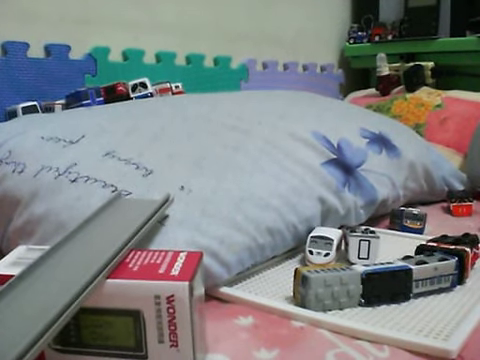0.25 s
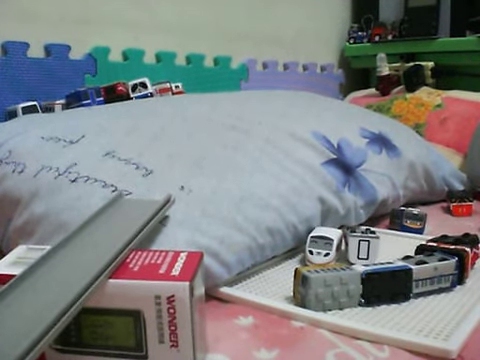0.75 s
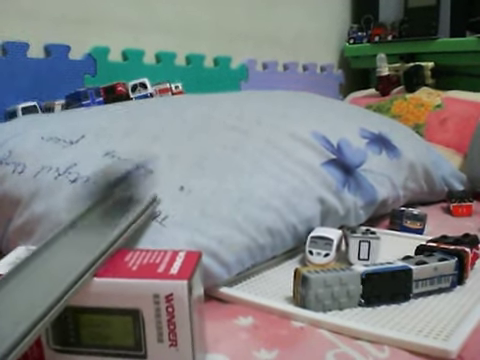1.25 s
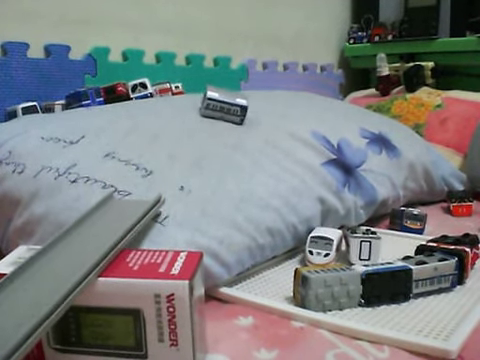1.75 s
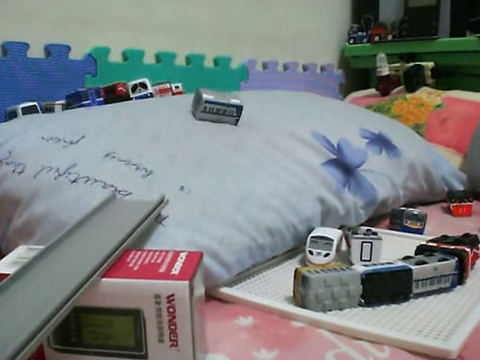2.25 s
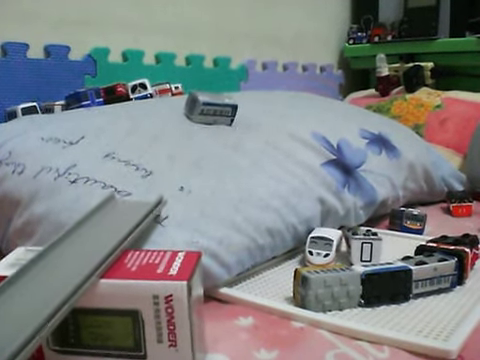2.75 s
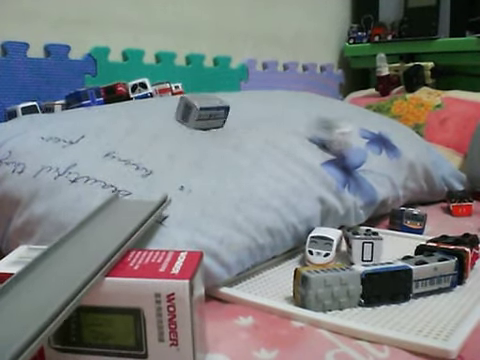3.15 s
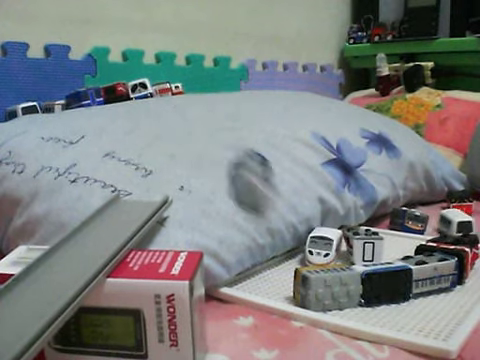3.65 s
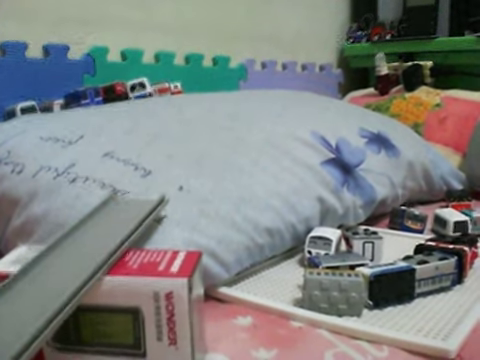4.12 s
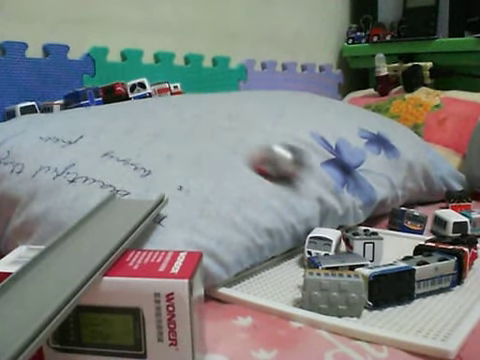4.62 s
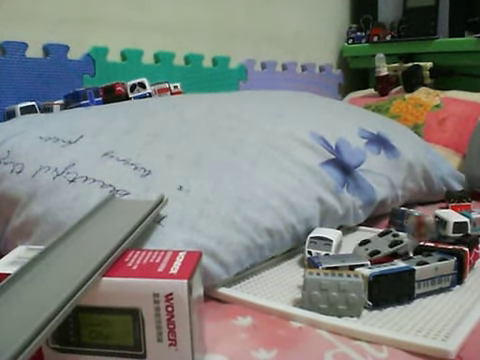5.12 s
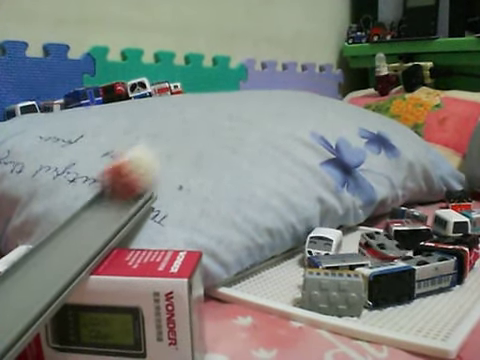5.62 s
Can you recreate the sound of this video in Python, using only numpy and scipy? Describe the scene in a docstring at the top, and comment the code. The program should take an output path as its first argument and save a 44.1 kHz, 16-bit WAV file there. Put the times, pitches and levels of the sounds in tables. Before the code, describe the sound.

Close up in a small, quiet room, a flywheel toy train is wound with three quick whirring strokes. Toy trains then go over a plastic ramp one after another: a brief clatter of hard wheels, then a buzzing gear rattle that slowly softens. Sharp plastic clicks and hollow knocks mark their collisions, while another toy whirs faintly further off. The last two pushes whine upward, the final one with a quick ratcheting skip.

```python
"""Flywheel toy trains on a ramp.

A small room, microphone close. Toy trains are wound by hand and pushed over a plastic ramp onto a
pillow, with faint whirring further off. Gear teeth whine upward under a push and hard wheels rumble
on the ramp; then loose gears rattle in the shell, ever softer as the flywheel runs down.
The toys click against each other and knock on the ramp and the floor."""
import sys
import numpy as np
from scipy import signal
from scipy.fft import rfft, irfft
from scipy.io import wavfile
from scipy.ndimage import uniform_filter1d

SR = 44100
rng = np.random.default_rng(int(sys.argv[2]) if len(sys.argv) > 2 else 0)


def transcribe(u):
    """Save the signal u as a 16-bit wav file named by the first command-line argument.

    u: samples, shape (n,) or (channels, n), limited to [-1, 1]; the rate is SR.
    q: integer samples, one column per channel.
    """
    v = np.clip(np.atleast_2d(u).T, -1, 1)
    q = np.round(v * 32767).astype(np.int16)
    wavfile.write(sys.argv[1], SR, q)


N = 259308
TIME = np.arange(N) / SR


def amp(db):
    """Decibels to gain."""
    return 10 ** (np.asarray(db) / 20)


def unit(x):
    """Scale to rms 1."""
    return x / np.sqrt(np.mean(x ** 2) + 1e-18)


def steady(x):
    """Hold the running rms near 1."""
    return x / np.sqrt(np.abs(uniform_filter1d(x ** 2, size=6000)) + 1e-12)


def progress(start, end):
    """Rises from 0 to 1 between two times."""
    return np.clip((TIME - start) / (end - start), 0, 1)


def gate(start, end):
    """1 between two times, with soft edges."""
    return uniform_filter1d(1. * ((TIME >= start) & (TIME <= end)), size=200)


def band(x, hz, kind, order=2):
    """Butterworth filter."""
    return signal.sosfilt(signal.butter(order, hz, kind, fs=SR, output="sos"), x)


def through(x, response):
    """Pass a sound through an impulse response."""
    return signal.fftconvolve(x, response)[:len(x)]


def fading(t60, seconds):
    """Noise that dies away, energy 1: a crowd of close modes."""
    t = TIME[:int(seconds * SR)]
    tail = rng.standard_normal(len(t)) * amp(-60 * t / t60)
    return tail / np.linalg.norm(tail)


def body(colour, rings=(), broad_db=0, size=4096):
    """Impulse response of a broad colour with resonances standing out of it."""
    f = np.arange(size // 2 + 1) * SR / size + 1
    hz, db = np.transpose(colour)
    power = amp(np.interp(np.log(f), np.log(hz), db) + broad_db) ** 2
    for centre, width, ring_db in rings:
        power += amp(ring_db) ** 2 / (1 + ((f - centre) / width) ** 2) ** 2
    cepstrum = irfft(np.log(power) / 2)
    cepstrum[1:size // 2] *= 2  # fold to minimum phase, so the ring follows the blow
    cepstrum[size // 2 + 1:] = 0
    return irfft(np.exp(rfft(cepstrum)))


def add(track, s, sound):
    """Mix a sound into the track at time s."""
    i = int(s * SR)
    track[i:i + len(sound)] += sound[:N - i]


# Colour of the room's own noise at the microphone: f/Hz, level/dB
ROOM_COLOUR = [(25, -6), (60, -7), (120, 0), (200, -9.5), (300, -8.5), (600, -9.5), (2000, -18),
               (10000, -31)]


def room_tone():
    """Low room noise with a faint wavering hum."""
    noise = unit(through(rng.standard_normal(N), body(ROOM_COLOUR)))
    hum = unit(band(rng.standard_normal(N), [292, 302], "band"))
    return amp(-50.5) * noise + amp(-56) * hum


def grip(start, end, let_go, attack_s=.025):
    """The hand bears down, holds and lets go in one stroke."""
    return progress(start, start + attack_s) * (1 - progress(end - let_go, end))


# Hand strokes winding toy A, close up:
# start/s, end/s, whir/dB, fizz/dB, mid-stroke wheel whine/Hz, wheel whine/dB, let-go time/s
WINDING_STROKES = [(-.08, .15, -21.5, -24.5, 1110, -31.5, .05), (.14, .412, -20, -23.5, 1020, -35.5, .035),
                   (.39, .625, -19.5, -26.5, 830, -42, .13)]
# Its flywheel meanwhile: t/s, speed/(turns per s)
WINDING_SPEED = [(0, 93), (.6, 72)]


def winding():
    """Flywheel speed, whir gain and fizz gain of a toy whose gears sound with each stroke."""
    whir, fizz = np.zeros((2, N))
    for start, end, whir_db, fizz_db, _, _, let_go in WINDING_STROKES:
        pressure = grip(start, end, let_go)
        whir += pressure * amp(whir_db)
        fizz += pressure * amp(fizz_db)
    return np.interp(TIME, *np.transpose(WINDING_SPEED)), whir, fizz


def pace(start, release, run_down):
    """Share of top speed: the hand speeds the flywheel up, then friction slows it."""
    push = np.sin(np.pi / 2 * progress(start, release))
    return push * np.exp(-np.maximum(TIME - release, 0) / run_down)


def running(run, roll_off_s=.02):
    """Speed, whir gain and fizz gain of a run: louder when fast; the ramp shifts both levels."""
    start, release, leaves, stop, top, run_down, whir_db, fizz_db, ramp_whir_db, ramp_fizz_db = run
    share = pace(start, release, run_down)
    on_ramp = 1 - progress(leaves - roll_off_s, leaves + roll_off_s)
    whir = gate(start, stop) * share ** .55 * amp(whir_db + ramp_whir_db * on_ramp)
    fizz = gate(start, stop) * share ** .85 * amp(fizz_db + ramp_fizz_db * on_ramp)
    return top * share, whir, fizz


def gear_rattle(drive, timbre, teeth, scatter_db, wobble_db, turn_db, split_hz=4500):
    """Loose gear teeth tap the shell; an off-centre wheel makes them hit harder once a turn."""
    speed, whir_gain, fizz_gain = drive
    turns = np.cumsum(speed) / SR
    strikes = np.diff(np.floor(turns * teeth), prepend=0) > 0
    this_turn = rng.uniform(-1, 1, 1000)[turns.astype(int)]
    tight_spot = np.exp(-(turns % 1) / .4)
    force = strikes * amp((wobble_db + turn_db * this_turn) * tight_spot)
    out = np.zeros(N)
    for side, gain in ("low", whir_gain), ("high", fizz_gain):
        flank = np.sign(rng.uniform(-1, 1, N))  # with backlash a tooth lands on either flank
        taps = force * flank * amp(scatter_db * rng.uniform(-1, 1, N))
        out += gain * steady(band(through(taps, timbre), split_hz, side, order=6))
    return out


# Flywheel runs: FAR_RUN and LANDED_RUN faint and further off, the others near the microphone.
# push/s, release/s, off the ramp/s, stop/s, top speed/(turns per s), run-down time constant/s,
# whir/dB, fizz/dB, whir change on the ramp/dB, fizz change on the ramp/dB
FAR_RUN = (-.3, -.2, -.1, 4.3, 38.5, 5.2, -33.2, -31.8, 0, 0)
B_RUN = (1.0, 1.14, 1.29, 3.48, 94, 1.85, -24, -24.5, -3.2, 2.8)
BRIEF_RUN = (2.64, 2.79, 2.93, 2.945, 75, 1.5, -39, -32, 1, 2.5)
LANDED_RUN = (3.31, 3.41, 3.41, 4.1, 32, 4, -37, -35.5, 0, 0)
C_RUN = (4.029, 4.129, 4.39, 5.255, 105, 2.2, -24.3, -20.7, 2.5, 2.7)
D_RUN = (5.25, 5.355, 5.62, 6, 107, 3.5, -24.8, -22.5, 2.8, 2.4)
# Broad colour of each toy's whir, with the room's low hum near 290 Hz: f/Hz, level/dB
A_COLOUR = [(88, -60), (150, -27), (285, -18.5), (368, -23), (638, -27), (973, -22), (1240, -28),
            (1630, -4.5), (2260, -10), (3850, -2.5), (4460, -8.5), (10200, -7.5), (12000, -18),
            (15600, -65), (22000, -120)]
B_COLOUR = [(88, -53), (150, -22), (290, -26), (324, -33), (362, -20.5), (1210, -21), (1540, -14.5),
            (2030, -13.5), (3390, -5), (4540, -17.5), (7180, -4.5), (9460, -11), (12000, -19.5),
            (15600, -69), (22000, -120)]
C_COLOUR = [(88, -54), (150, -20.5), (342, -14), (551, -14), (1430, -6.5), (1630, -9.5), (2670, -6.5),
            (3320, -8), (4710, -3), (6430, 1), (7310, -1), (9990, -1), (12000, -24), (15600, -52),
            (22000, -120)]
D_COLOUR = [(88, -44), (150, -21.5), (290, -23), (396, -16), (551, -25), (767, -16), (1430, -17.5),
            (1540, -18), (2770, -10.5), (4300, -7.5), (6200, 4.5), (10400, -1), (12000, -10), (15600, -53),
            (22000, -120)]
FAR_COLOUR = [(88, -51), (150, -20.5), (290, -5.5), (467, -19), (562, -15), (1170, -8), (1400, -2),
              (1720, -6), (2430, 3), (4710, -9.5), (6090, -6.5), (8950, -9.5), (12000, -17), (15600, -62),
              (22000, -120)]
# Resonances of each shell: f/Hz, width/Hz, level/dB
A_MODES = [(1000, 130, -15.5), (1670, 110, -10), (2670, 110, -14), (3500, 130, -2.5), (3900, 240, 2.5),
           (5200, 250, -6.5), (6400, 200, -6.5)]
B_MODES = [(1540, 51, -7.5), (3397, 82, 1), (3730, 140, -2.5), (5460, 620, -7), (5900, 170, -15.5),
           (9360, 890, -4.5)]
C_MODES = [(1110, 80, -15), (2670, 220, -0.5), (4000, 170, -7), (4820, 130, 0.5), (6100, 500, -7),
           (10200, 1240, -1.5)]
D_MODES = [(2800, 190, -8.5), (5020, 240, 2), (6070, 370, 1), (7900, 330, 3)]
FAR_MODES = [(1480, 45, -8), (2510, 360, -1.5), (3760, 300, -1), (6230, 260, -3), (8460, 220, -2),
             (9570, 250, -1)]


def motors():
    """Flywheels drive the gears: toys A to D take turns close by, with two faint runs further off."""
    timbre_a = body(A_COLOUR, A_MODES, broad_db=-.5)
    timbre_b = body(B_COLOUR, B_MODES, broad_db=-3.2)
    timbre_c = body(C_COLOUR, C_MODES, broad_db=-2)
    timbre_d = body(D_COLOUR, D_MODES, broad_db=1)
    timbre_far = body(FAR_COLOUR, FAR_MODES, broad_db=2)
    timbre_landed = body(FAR_COLOUR, FAR_MODES)
    a = gear_rattle(winding(), timbre_a, teeth=32, scatter_db=7, wobble_db=2.5, turn_db=5)
    b = gear_rattle(running(B_RUN), timbre_b, teeth=32, scatter_db=9, wobble_db=10, turn_db=3.5)
    brief = gear_rattle(running(BRIEF_RUN), timbre_b, teeth=32, scatter_db=6, wobble_db=3, turn_db=3)
    c = gear_rattle(running(C_RUN), timbre_c, teeth=32, scatter_db=7, wobble_db=6, turn_db=4.5)
    d = gear_rattle(running(D_RUN), timbre_d, teeth=32, scatter_db=8.5, wobble_db=3.5, turn_db=6.5)
    far = gear_rattle(running(FAR_RUN), timbre_far, teeth=64, scatter_db=4, wobble_db=5, turn_db=2.5)
    landed = gear_rattle(running(LANDED_RUN), timbre_landed,
                         teeth=48, scatter_db=4, wobble_db=3, turn_db=2.5)
    sinking = amp(-4.5 * progress(2.93, 2.95))  # toy B is bumped and sinks into the pillow
    return a + far + b * sinking + brief + landed + c + d


def whine(hz, slip_hz):
    """Under load the teeth stay in contact and sing a rough note, with its octave."""
    slip, load = (unit(band(rng.standard_normal(N), 400, "low")) for _ in range(2))
    phase = 2 * np.pi * np.cumsum(hz + slip_hz * slip) / SR
    # the shell radiates the octave best near 5 kHz
    octave_gain = 1.5 * np.exp(-np.log((2 * hz + 1) / 5000) ** 2 / .4)
    return (1 + .4 * load) * (np.sin(phase) + octave_gain * np.sin(2 * phase))


# Brief notes of coasting gears, close up: start/s, end/s, first f/Hz, last f/Hz, level/dB
COASTING_NOTES = [(4.12, 4.38, 2630, 2540, -27), (4.2, 4.44, 4150, 4000, -28), (4.2, 4.75, 4900, 4700, -33),
                  (4.9, 5.28, 2700, 2830, -32), (5.39, 5.56, 4000, 5400, -28)]


def gear_whines(wind_cycles_per_turn=20.5, push_cycles_per_turn=40.5):
    """Gear notes follow the speed: they arch in strokes, climb in two pushes and drift when coasting."""
    speed, whir, _ = winding()
    out = amp(-30.5) * whir / whir.max() * whine(wind_cycles_per_turn * speed, slip_hz=55)
    for start, end, _, _, hz, db, let_go in WINDING_STROKES:
        arch = 1 - .22 * (2 * progress(start, end) - 1) ** 2  # the wheels are slower at each end
        out += amp(db) * grip(start, end, let_go) * whine(hz * arch, slip_hz=85)
    for run, db in (C_RUN, -22.5), (D_RUN, -18):
        start, release, _, _, top, run_down, *_ = run
        share = pace(start, release, run_down)
        gain = amp(db) * gate(start, release) * share ** 1.3
        out += gain * whine(push_cycles_per_turn * top * share, slip_hz=25)
    for start, end, first_hz, last_hz, db in COASTING_NOTES:
        along = progress(start, end)
        hz = first_hz + (last_hz - first_hz) * along
        out += amp(db) * np.sin(np.pi * along) * whine(hz, slip_hz=85)
    return out


# Broad colour of struck plastic, close up: f/Hz, level/dB
PLASTIC_COLOUR = [(150, -8.5), (800, -7), (1500, -3), (3000, -6.5), (4500, -2.5), (6500, -4), (9000, 6),
                  (12000, -4.5)]
# Its resonances: f/Hz, width/Hz, level/dB
PLASTIC_MODES = [(2430, 490, -15), (3550, 330, -4), (5300, 740, -15), (8540, 300, -4), (9500, 1200, -4)]


def click(db, treble_db, hz, t60, split_hz=6000):
    """Plastic meets plastic: a crack and a brief shell ring, its pitch set by where it is struck."""
    blow = fading(t60, seconds=.08)
    blow[0] += .25  # the first hard contact
    crack = through(blow, body(PLASTIC_COLOUR, [*PLASTIC_MODES, (hz, 600, 3)]))
    middle = band(crack, split_hz, "low", order=4)
    treble = band(crack, split_hz, "high", order=4)
    onset_rms = np.std(treble[:int(.008 * SR)])
    return amp(db) * (middle / np.abs(middle).max() + amp(treble_db) * treble / onset_rms)


# Collisions near the microphone: t/s, level/dB, treble against that level/dB, ring f/Hz, t60/s
COLLISIONS = [(.419, -13, -20, 3900, .018), (.461, -11, -14, 3870, .01), (.583, -15, -22, 3880, .015),
              (.7317, -15.5, -12, 3270, .018), (1.009, -13, -3, 4250, .007),
              (1.054, -11.5, -2.5, 3900, .01), (1.112, -7, -25, 5250, .044), (1.135, -7, -9, 3800, .016),
              (1.209, -8, -10.5, 3300, .012), (1.261, -8, -13, 5500, .064), (2.634, -15, -22, 3400, .016),
              (2.787, -8, -23, 4440, .013), (2.796, -3, -17, 3380, .027), (2.9165, -9, -19, 3590, .014),
              (2.931, -3.5, -20, 2130, .022), (3.316, 2, -18.5, 4300, .016),
              (3.4105, -.5, -20.5, 3040, .015), (3.801, -8, -13, 3400, .06), (3.815, -8, -16, 2200, .054),
              (3.854, -12, -19, 4370, .033), (3.866, -7, -20, 4970, .013), (3.874, -4.5, -17, 6250, .016),
              (4.035, -10.5, -17, 3370, .04), (4.137, -4, -16, 2650, .019), (4.2945, -8, -12, 2510, .012),
              (4.757, -7.5, -9, 4600, .021), (4.768, -4, -16, 2840, .02), (4.949, -7.5, -9, 2680, .012),
              (4.958, -7.5, -20, 2840, .012), (5.118, -12, -15, 2740, .013), (5.583, -14, 0, 6160, .07)]


def clicks():
    """The toys bump each other and the ramp."""
    out = np.zeros(N)
    for s, db, treble_db, hz, t60 in COLLISIONS:
        add(out, s, click(db, treble_db, hz, t60))
    return out


# Knocks on ramp, box and floor: t/s, level/dB, centre f/Hz
HOLLOW_KNOCKS = [(.46, -19, 442), (.461, -10.5, 1060), (.732, -32, 300), (1.122, -9.5, 520),
                 (1.271, -12, 1200), (2.262, -20, 800), (2.283, -22, 1100), (2.39, -20, 1200),
                 (2.787, -14.5, 790), (2.797, -10, 1000), (2.918, -14, 1150), (2.932, -11, 1200),
                 (3.316, -29, 250), (3.316, -17, 1100), (3.411, -16, 1300), (3.802, -24, 125),
                 (3.802, -20, 590), (3.866, -6.5, 910), (3.874, -13, 800), (3.876, -31, 125),
                 (4.117, -10.5, 506), (4.293, -13, 420), (4.765, -31, 100), (4.992, -21.5, 240),
                 (5.123, -28, 170), (5.514, -19, 395), (5.56, -20, 507)]


def knocks():
    """A toy drops on something hollow: a short burst of modes around one pitch; low ones ring longer."""
    out = np.zeros(N)
    for s, db, hz in HOLLOW_KNOCKS:
        width_hz = .7 * hz
        t60 = .027 * (1000 / hz) ** .55
        low_hz = np.hypot(hz, width_hz / 2) - width_hz / 2
        knock = band(fading(t60, seconds=.2), [low_hz, low_hz + width_hz], "band")
        add(out, s, amp(db) * knock / np.abs(knock).max())
    return out


# Broad colour of the plastic ramp, close up: f/Hz, level/dB
RAMP_COLOUR = [(88, -26), (150, -17), (303, -8.5), (404, -10), (710, -4), (878, 3), (1260, 5), (1410, -10),
               (1560, -14), (2490, 15), (3000, -39), (3900, -49), (6600, -120)]
# Its resonances: f/Hz, width/Hz, level/dB
RAMP_MODES = [(409, 88, -7), (1300, 190, 11.5), (1770, 280, 3.5)]
# Wheel passes on it: loudest t/s, rise and fall time constants/s, rumble/dB, clatter/dB
WHEEL_PASSES = [(1.108, .045, .014, -28.5, -20.5), (1.208, .015, .05, -29.5, -28),
                (2.722, .05, .018, -34, -25.5), (4.11, .032, .02, -22, -19.5),
                (4.225, .008, .09, -33, -28.5), (5.13, .012, .025, -46, -30), (5.292, .05, .05, -34, -43),
                (5.48, .04, .08, -39, -47), (5.644, .01, .014, -30, -38)]


def wheels(bumps_per_s=900, jolts_per_s=260):
    """Hard little wheels bump along the ramp and ring it; jolts shake loose parts of the toy."""
    bumps = (rng.random(N) < bumps_per_s / SR) * rng.standard_normal(N)
    ramp = through(bumps, body(RAMP_COLOUR, RAMP_MODES, broad_db=-4.5))
    rumble = unit(band(ramp, 715, "low", order=4))
    clatter = unit(band(ramp, 550, "high", order=4))
    jolts = (rng.random(N) < jolts_per_s / SR) * rng.uniform(-1, 1, N)
    shaken = through(jolts, fading(t60=.0073, seconds=.03))
    rattle = unit(through(shaken, body(PLASTIC_COLOUR, PLASTIC_MODES)))
    out = np.zeros(N)
    for s, rise, fall, rumble_db, clatter_db in WHEEL_PASSES:
        swell = np.exp(-np.maximum((s - TIME) / rise, (TIME - s) / fall))
        swell *= gate(s - 2.5 * rise, s + 3 * fall)
        out += swell * (rumble * amp(rumble_db) + (clatter + .7 * rattle) * amp(clatter_db))
    return out


def skipping_gear(count, start_s=5.2525, first_gap_s=.0219, db_per_skip=-.6):
    """A gear skips under the last hard push, faster and lighter as the flywheel catches up."""
    out = np.zeros(N)
    for k in range(count):
        skip = click(db=-3 + db_per_skip * k, treble_db=-15, hz=4000, t60=.01)
        add(out, start_s + first_gap_s * k ** .67, skip)
    return out


def scene():
    """The toys at one close microphone, with the small room's short echo behind them."""
    toys = motors() + gear_whines() + amp(1) * wheels() + clicks() + skipping_gear(count=9) + knocks()
    wall_delay = np.zeros(int(.009 * SR))
    wall_tail = band(fading(t60=.3, seconds=.5), 7800, "low", order=1)
    echo = through(toys, np.concatenate([wall_delay, wall_tail]))
    return (amp(-.45) * toys + amp(-9.5) * echo + room_tone())[None]


def record(dry):
    """The microphone port cuts a treble notch; the top rolls off and the loudest peaks are rounded."""
    notch_hz, half_width_hz, notch_depth = 7220, 225, .8
    roll_off_hz, top_hz, ceiling = 10800, 12300, .76
    port = band(dry, [notch_hz - half_width_hz, notch_hz + half_width_hz], "band", order=1)
    dulled = band(dry - notch_depth * port, roll_off_hz, "low", order=7)
    rounded = ceiling * np.tanh(dulled / ceiling)
    return signal.sosfiltfilt(signal.ellip(8, .1, 50, top_hz, fs=SR, output="sos"), rounded)


dry = scene()
out = record(dry)
transcribe(out)
```